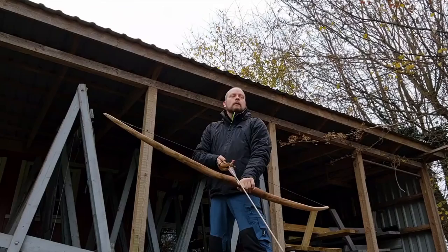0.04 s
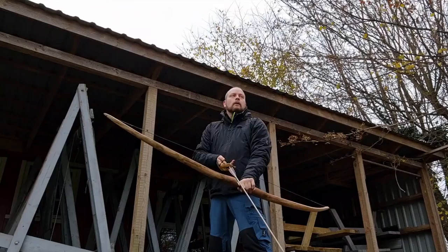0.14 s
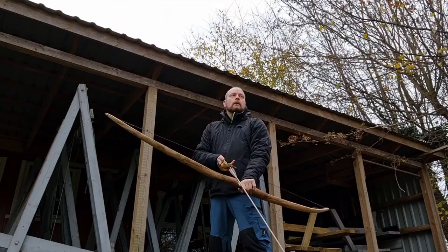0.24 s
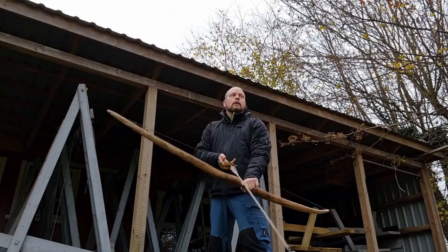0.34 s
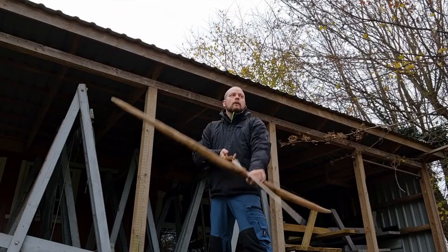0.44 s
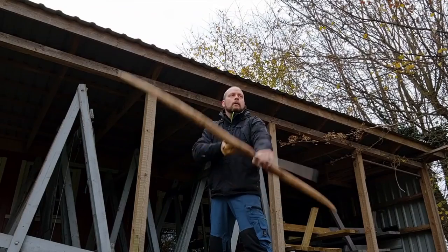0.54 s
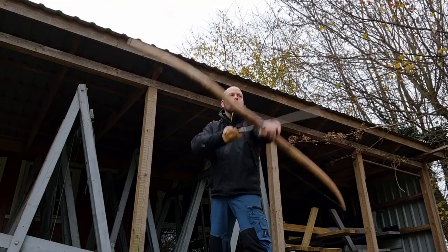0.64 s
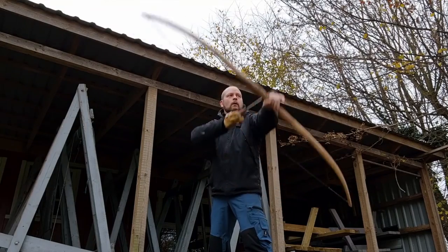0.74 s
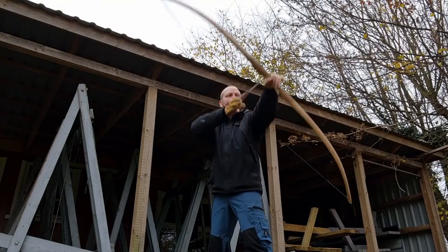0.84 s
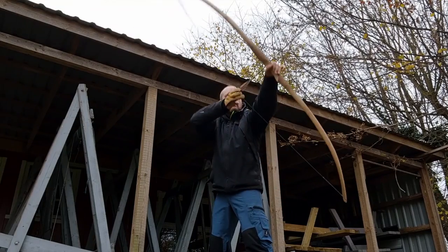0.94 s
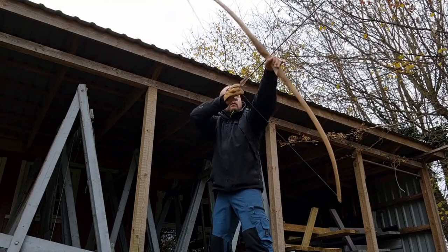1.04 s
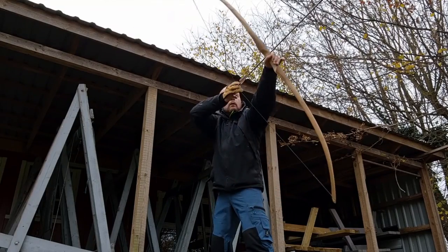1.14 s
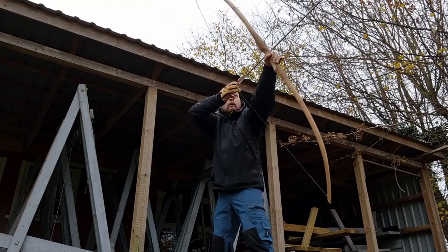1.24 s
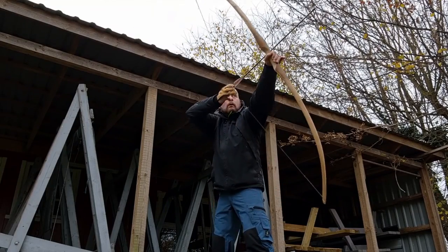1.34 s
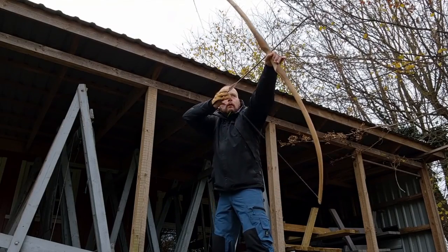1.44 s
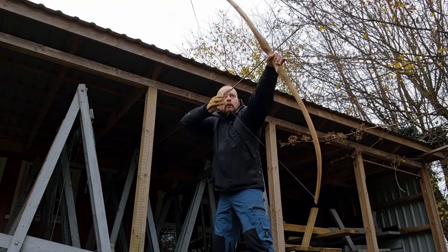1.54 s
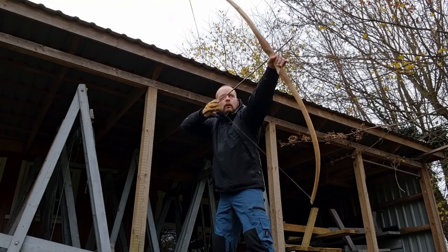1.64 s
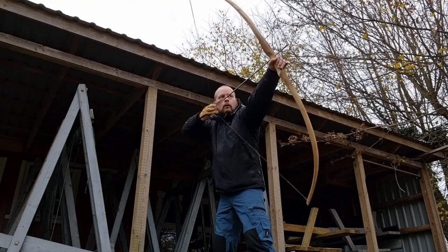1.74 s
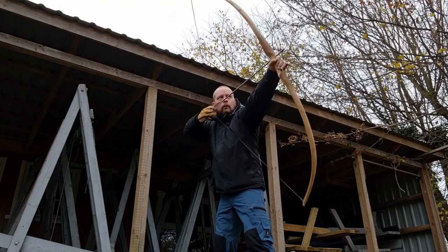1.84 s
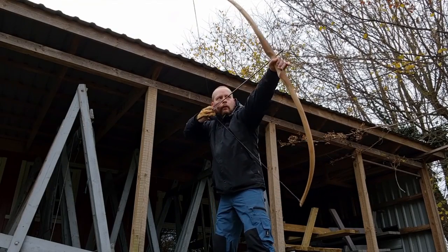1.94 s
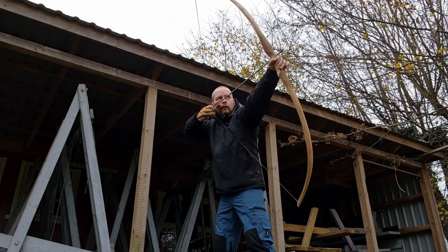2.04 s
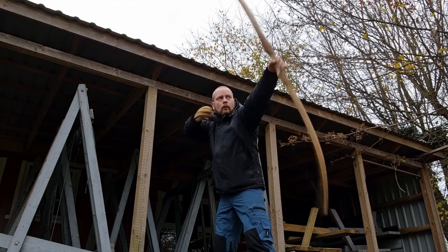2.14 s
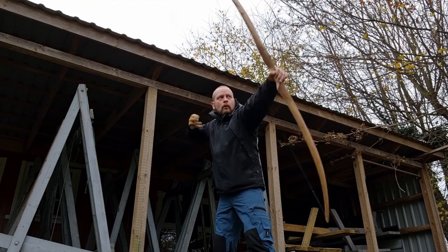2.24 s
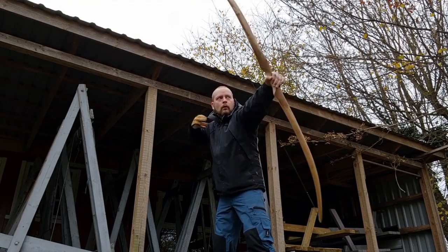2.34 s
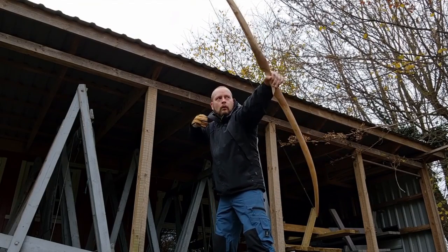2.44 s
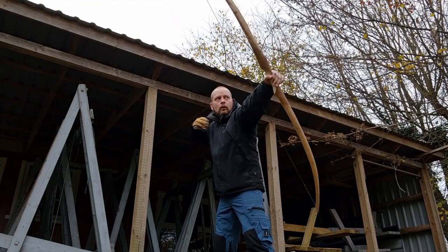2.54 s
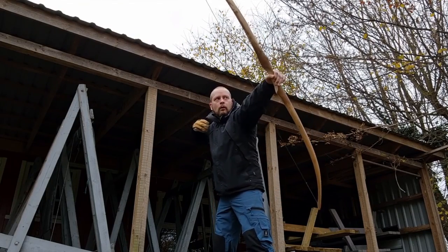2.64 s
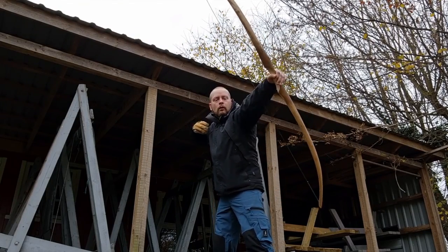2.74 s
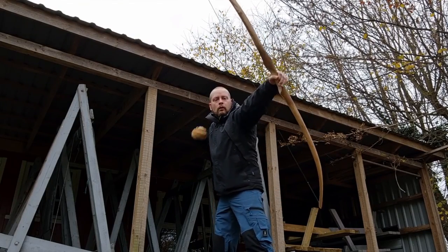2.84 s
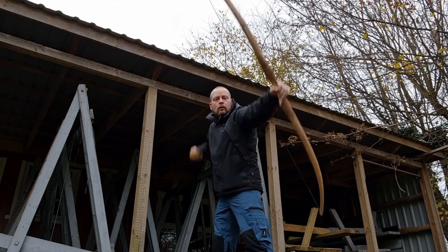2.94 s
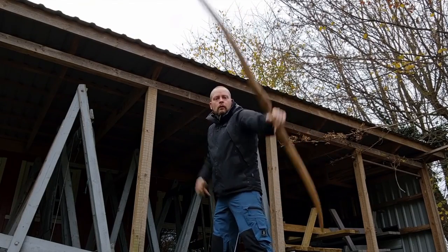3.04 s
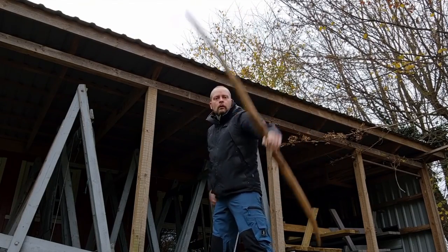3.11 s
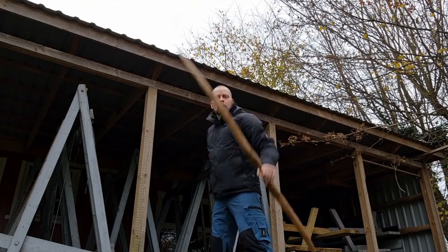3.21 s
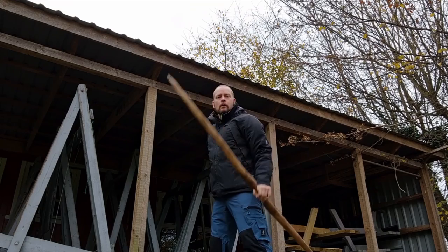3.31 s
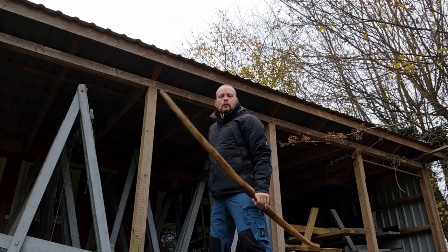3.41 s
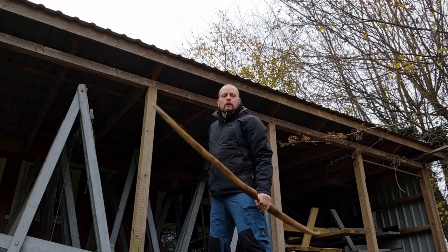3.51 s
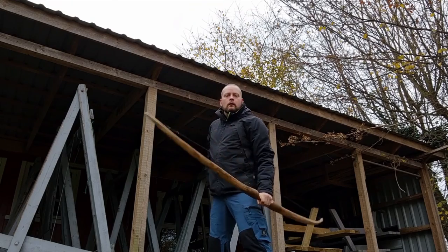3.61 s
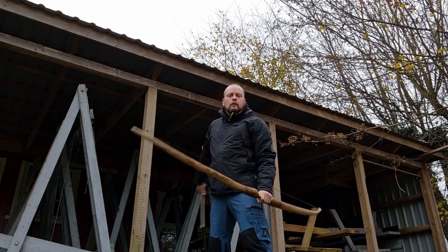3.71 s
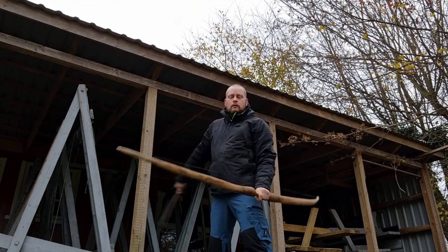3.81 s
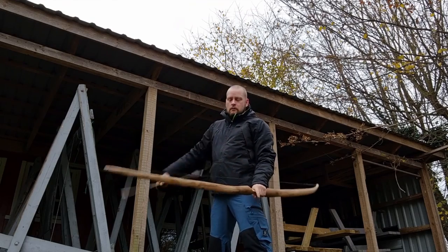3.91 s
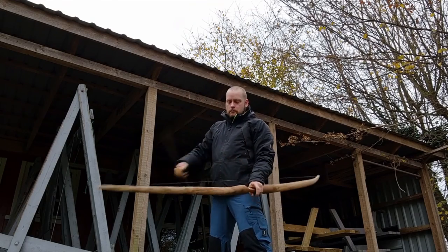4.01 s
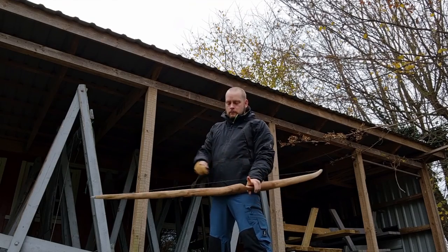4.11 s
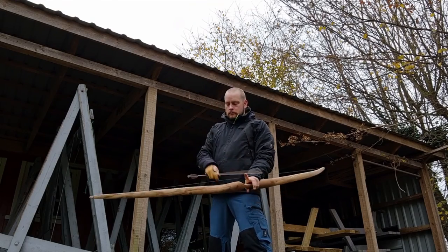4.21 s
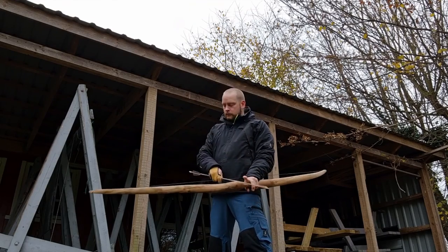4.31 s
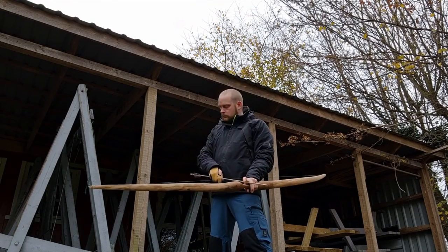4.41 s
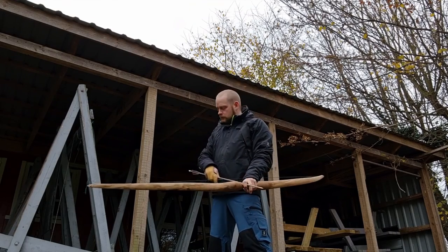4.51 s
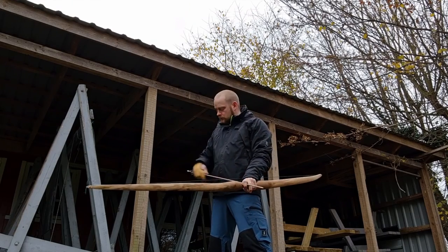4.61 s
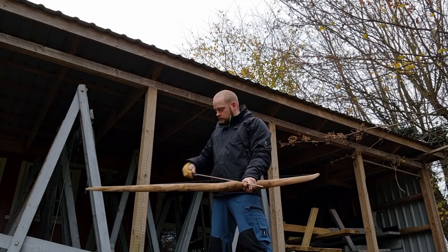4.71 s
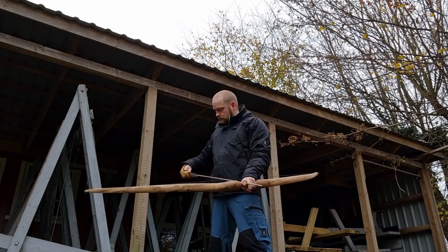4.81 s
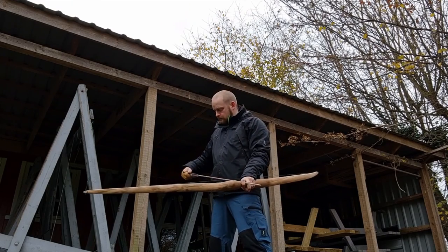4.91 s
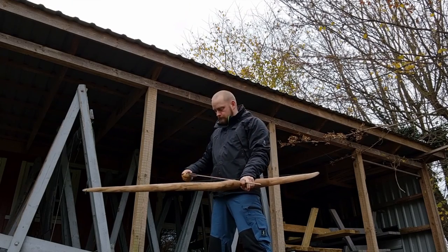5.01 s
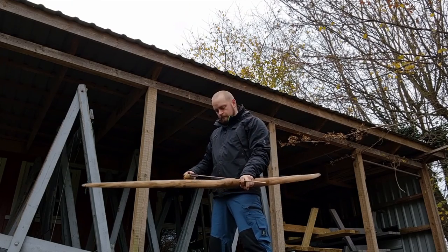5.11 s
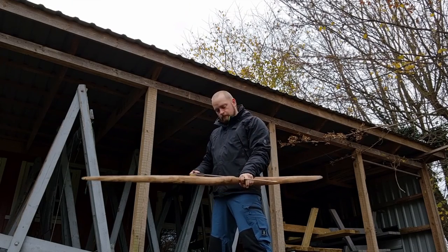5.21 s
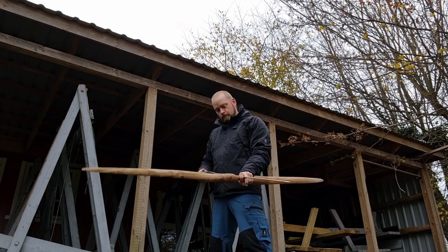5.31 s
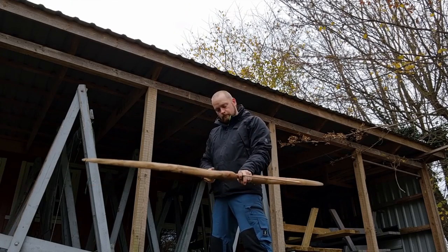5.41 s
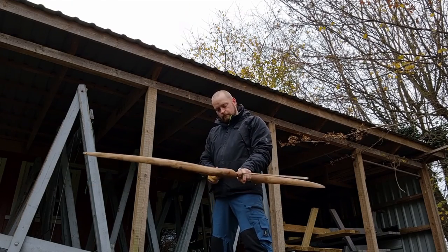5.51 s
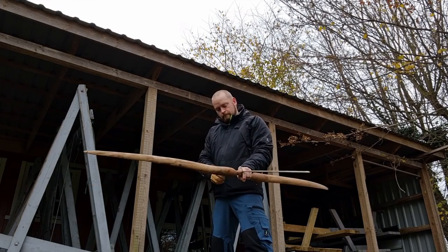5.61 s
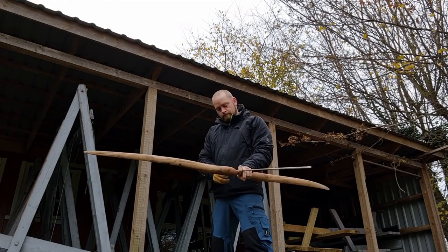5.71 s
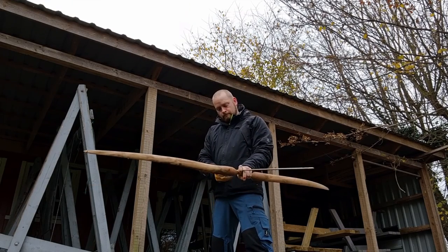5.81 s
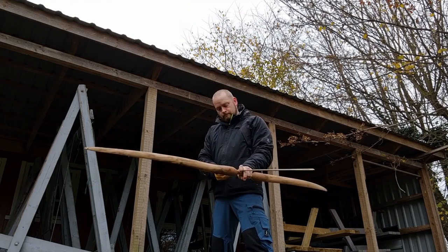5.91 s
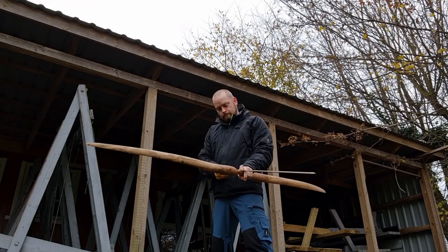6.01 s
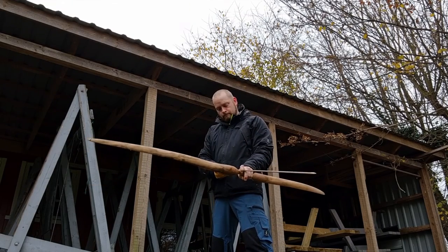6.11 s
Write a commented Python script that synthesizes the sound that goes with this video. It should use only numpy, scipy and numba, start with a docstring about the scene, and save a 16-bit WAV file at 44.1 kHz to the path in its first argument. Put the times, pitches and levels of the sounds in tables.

```python
"""Far traffic rumbles throughout; a longbow swung upward hums, is shot, and its string whistles and snaps taut.
The arrow thuds into a straw target, an open shed returns the thud, and a new arrow clicks and slides on the bow.
Small birds, a rustling jacket and a lorry idling up fill the quiet. Impacts are decaying modes, moving air is
band-passed noise, the swung string and limb are aeolian tones, and the shed is a decaying noise tail."""
import sys
import numpy as np
from scipy import signal
from scipy.fft import rfft, irfft
from scipy.io import wavfile
from scipy.ndimage import uniform_filter1d
from numba import njit

SR = 44100
rng = np.random.default_rng(int(sys.argv[2]) if len(sys.argv) > 2 else 0)


def dump_mix(stems):
    """Bounce the given channels to the path in sys.argv[1] as a 16-bit WAV at rate SR."""
    frames = np.atleast_2d(stems).T  # one column per channel
    limited = np.clip(frames, -1, 1)  # hard clip at full scale
    pcm = np.round(limited * 32767).astype(np.int16)
    wavfile.write(sys.argv[1], SR, pcm)


N = 271377

# Far traffic rumble; only the departure from the mean level is used: [t/s, level/dB]
TRAFFIC_RUMBLE = [(0, -66), (.25, -60), (.6, -66.5), (1.3, -58), (1.95, -62), (2.3, -58.5), (2.88, -58.5),
                  (3.01, -63), (3.25, -59), (4.2, -62), (4.8, -64), (5.36, -58.5), (5.75, -62),
                  (6.15, -54.5)]
# Spectrum of the outdoor air, relative: [f/Hz, level/dB per Hz]
AIR_SPECTRUM = [(15, -40), (25, -26), (53, 4.5), (76, 2.5), (206, -19), (301, -19), (754, -26), (1020, -33),
                (1520, -31.5), (2690, -48.5), (3920, -52.5), (6210, -48.5), (9320, -62), (14800, -55),
                (16000, -66)]
AIR_DB = -56.5
# Correlation of left and right in the outdoor air: [f/Hz, correlation]
AIR_CORRELATION = [(60, 0.94), (130, 0.085), (290, 0.95), (640, 0.017), (3100, 0.036), (6820, 0.36),
                   (15000, 0)]
# Lorry engine, a first cough, then it catches and settles to idle: [t/s, hold/s, level/dB]
LORRY_RUNS = [(4.968, 0.077, -54), (5.162, .05, -50), (5.273, 1.0, -49)]
LORRY_RISE_S, LORRY_FALL_S = 0.084, 0.044
COUGH_HZ, IDLE_HZ, SETTLE_S = 69.4, 56, 0.0752

# Jacket rustling as the arms move, before the trims of each layer:
# [t/s at full level, hold/s, bright level/dB, dull level/dB]
JACKET_MOVES = [(0.443, 0.18, -79.5, -71.5), (.75, 0.33, -86, -80), (1.462, 0.17, -77, -78.5),
                (2.225, 0.062, -74, -69), (2.45, 0.36, -92.5, -80.5), (3.097, 0.28, -89.5, -82),
                (3.4, 0.069, -85, -72.5), (3.809, 0.19, -83.5, -76.5), (4.143, 0.26, -82, -70),
                (4.519, .15, -89, -76.5), (4.76, .06, -80, -75), (5.173, 0.39, -92.5, -76),
                (5.45, 0.43, -90.5, -77), (5.999, .15, -93.5, -82)]
RUSTLE_RISE_S, RUSTLE_FALL_S = .45, 0.39

# Notes of distant birds: [t/s, f/Hz, length/s, level/dB]
BIRD_NOTES = [(1.057, 4070, .098, -86), (1.116, 4570, .067, -86), (1.357, 5840, .07, -85),
              (1.455, 5950, .058, -71.5), (1.527, 5760, .029, -78.5), (1.571, 6240, .021, -75),
              (1.631, 5700, .023, -77), (1.644, 5080, .03, -76), (1.768, 4010, .046, -80.5),
              (1.794, 4598, .1, -86), (1.854, 4060, .034, -80), (1.856, 5950, .056, -79.5),
              (1.937, 4330, .06, -80), (2.006, 4020, .045, -85), (2.028, 4700, .03, -83.5),
              (2.091, 4177, .05, -84.5), (3.726, 3850, .046, -83), (3.746, 4260, .031, -88.5),
              (3.792, 4000, .03, -84), (3.805, 4510, .042, -78), (3.88, 3720, .033, -80.5),
              (3.896, 4160, .014, -83), (3.952, 4100, .076, -80)]
# Blurred twittering further off: [t/s, length/s, centre f/Hz, level/dB]
TWITTER_BOUTS = [(1.06, 0.18, 4440, -84), (1.784, 0.39, 4400, -80), (2.4, .14, 4400, -79),
                 (3.74, .25, 4180, -83.5), (5.17, 0.21, 4540, -86.5)]
TWITTER_EDGE_S = .1

# Reverberation of the shed by band: [f/Hz, decay time T60/s, relative level/dB]
SHED_BANDS = [(123.44, .3, -3.5), (250, 0.33, 1.5), (476, 0.32, -2.5), (1020, 0.27, -2.5),
              (2020, 0.19, 3.5), (3500, .25, 0.5), (5840, 0.085, -9), (8550, 0.24, -1), (13857, 0.15, -1)]
SHED_DB, SHED_GAP_S = -12.5, 0.0013
SNAP_INTO_SHED_DB = -11.5  # the shriek is beamed forward, away from the shed

# Arrow and fingers tapping wood; level is the rms over the rattle: [t/s, level/dB, contact/ms,
# rattle/ms, ring level against the dry knock/dB, left minus right level/dB]
TAPS = [(.7025, -54, 1.4, 1.18, 5, -3), (1.477, -75, .1, 2.8, -17, -8), (3.214, -76, 0.55, 3, -14, -7),
        (3.382, -64, 1.73, 17.5, -19, -5), (4.315, -53.5, 0.57, 6.7, -11.5, -4),
        (4.404, -62, 0.39, 16, -13, 4), (4.414, -49.5, 0.34, 9.2, -3.5, -8.5),
        (4.592, -71, 0.78, 12.5, -12.5, -4), (5.456, -63, 0.56, 31, 7, -6),
        (5.478, -57.5, 1.04, 17.5, 12, 1), (5.518, -67.5, .15, 7.5, -5, -3), (5.532, -69, .15, 5.2, -6, -3),
        (5.555, -67.5, .2, 8.7, -4, -5), (5.574, -70, 0.089, 8, -15, -3), (5.596, -70, .1, 5.7, -14, -3),
        (5.582, -66.5, 0.71, 25, -11, -6)]
# Modes of the arrow shaft: [f/Hz, relative level/dB, T60/s]
SHAFT_MODES = [(620, -22, 0.071), (775, -15.5, 0.09), (891, -6, 0.044), (1525, -8, 0.088),
               (2056, -2.5, 0.087), (2490, -3.5, 0.035), (3070, -0.5, 0.03), (4330, -33, .015)]
# Shaft sliding over wood and glove: [t/s at full level, rise/s, hold/s, fall/s, hiss level/dB,
# squeal f/Hz, squeal level above the hiss/dB]
SLIDES = [(4.313, .01, 0.0018, .09, -62.5, 2400, -12), (4.424, .01, 0.0018, 0.081, -66, 2860, 3.5),
          (4.595, 0.084, 0.019, 0.12, -79, 2110, 2), (4.739, 0.058, 0.043, 0.13, -73, 2950, 4),
          (4.807, 0.11, 0.043, 0.063, -77.5, 2710, -8), (5.443, .15, 0.032, .2, -78, 2100, 1),
          (5.526, 0.16, 0.069, 0.11, -73.5, 2370, -1)]
# Spectrum of the sliding hiss, relative: [f/Hz, level/dB per Hz]
SLIDE_SPECTRUM = [(590, -45), (1000, -16.5), (2420, -27), (2910, -12), (3570, -9), (3870, -7.5), (6260, 0),
                  (15500, -17)]

# String and limb cutting the air on the upswing: [t/s, whistle f/Hz, level/dB]
STRING_SWING = [(.33, 789, -74), (.385, 933, -64.5), (.42, 1084, -48.5), (.44, 1094, -52.5),
                (.475, 1085, -58), (.52, 901, -71), (.555, 804, -59.5), (.6, 789, -57.5), (.64, 790, -79)]
# The limb hums lower, at the height of the swing
LIMB_S, LIMB_RISE_S, LIMB_HOLD_S, LIMB_FALL_S = 0.422, 0.13, 0.083, 0.068
LIMB_HZ, LIMB_DB = 418, -64

# Arrow in the target, direct, back from the shed and last a faint late knock as the stand rocks back:
# [t/s, tip crack level/dB, tip contact/ms, body thump level/dB, lag of the thump/ms, thump contact/ms]
THUDS = [(2.6657, -19, 1.33, -15.5, 5.52, 5.9), (2.7067, -25.5, 1.5, -15, 9.7, 3),
         (2.828, -59, 1.8, -45, 5.4, 2.4)]
# Modes sounded by the tip: [f/Hz, relative level/dB, T60/s]
TIP_MODES = [(380, -8, 0.02), (487, 8, 0.022), (639, 7, 0.045), (740, 6, 0.03), (920, -23, .015)]
# Modes of the target body: [f/Hz, relative level/dB, T60/s]
BUTT_MODES = [(77, -19, 0.033), (121, 14, 0.049), (176, 2.5, 0.025), (204, 0.5, 0.083)]
# Spectrum of the clattering stand, relative: [f/Hz, level/dB per Hz]
STAND_SPECTRUM = [(88, -33), (150, 5), (306, -5.5), (655, -7), (764, -8), (1130, -23.5), (1210, -39),
                  (1500, -43), (1950, -57), (3300, -120)]
# Resonances of the stand: [f/Hz, width/Hz, level against the clatter noise/dB]
STAND_RESONANCES = [(356.3, 43, -4.5), (491.6, 27, -7), (761, 30, -13)]
# Straw crunches as the tip goes in, then settles; the stand clatters until the echo has passed
BITE_DB, BITE_FALL_S, SETTLE_DB, SETTLE_FALL_S = -41.5, 0.0051, -58, 0.098
STAND_DB, STAND_FALL_S, STAND_TAIL_DB, STAND_TAIL_S = -38.5, 0.094, -55.5, 0.65
QUIVER_HZ, QUIVER_DB = 92.7, 3  # the shaft quivers in the straw and chops the crunch
TARGET_PAN_DB, TARGET_LAG_MS = 0.5, 0.31  # the target stands to one side

# String slapping taut, then once more: [t/s, peak level/dB, length/ms]
SNAPS = [(2.2429, -2.5, 5.0), (2.2495, -24, 6.0)]
# Tones of the slap: [f/Hz, relative level/dB]
SNAP_TONES = [(4900, -9.5), (5620, -1.5), (6400, -2), (7100, -14.5), (8200, -14), (8800, -14)]

# Jolts through the stave: [t/s, peak level/dB, contact/ms, air puff level/dB, shaft clatter level/dB]
JOLTS = [(2.2319, -17.5, .3, -32, -31.5), (2.2454, -10, .5, -17.5, -38.5), (2.2522, -17, .4, -26, -27.5),
         (2.258, -23, 0.58, -47.5, -35.5)]
# Modes of the stave: [f/Hz, relative level/dB, T60/s]
STAVE_MODES = [(152, -21.5, 0.019), (269.3, -9.5, 0.071), (480, -5.5, 0.011), (717.6, 4.5, .018),
               (1010, -10.5, 0.004), (1286, -2.5, 0.035), (1880, -2.5, 0.024), (2367, -20.5, 0.013),
               (3300, -9.5, 0.0069)]
# Spectrum of the rushing air, relative: [f/Hz, level/dB per Hz]
RUSH_SPECTRUM = [(600, -33), (1500, -8.5), (3000, -5), (4000, -6), (6000, -10), (9000, -18), (12500, -15.5),
                 (15500, -27)]
# String whistling forward, its pitch climbing with speed
WHISTLE_S, WHISTLE_RISE_S, WHISTLE_HOLD_S, WHISTLE_FALL_S = 2.227, .016, 0.015, .016
WHISTLE_DB, WHISTLE_FROM_HZ, WHISTLE_TO_HZ = -36, 5500, 8500
CREEP_S, CREEP_DB = .055, -78  # fingers slipping off the string before the loose
PUFF_RISE_S, PUFF_HOLD_S, PUFF_FALL_S = .012, .001, .008
CLATTER_RISE_S, CLATTER_HOLD_S, CLATTER_FALL_S = 0.015, .002, .03
# String and stave shivering out after the last jolt
SHIVER_FALL_S, SHIVER_DB, SHIVER_CLATTER_DB, SHIVER_HISS_DB = .16, -45, -37, -47

TOP_HZ = 15800


def undb(db):
    """Level to amplitude: 20 dB is a factor of ten."""
    return 10 ** (np.asarray(db) / 20)


def unit(x):
    """Normalization to an rms of 1."""
    return x / np.sqrt(np.mean(x ** 2))


def unit_of(x, count):
    """Rms of a short sound whose energy is spread over count samples."""
    return np.sqrt(np.sum(x ** 2) / count)


@njit
def svf(x, hz, width):
    """Resonance: a state-variable band-pass with a moving centre, where its gain is 1."""
    y, b, l = np.empty(len(x)), 0., 0.
    for i in range(len(x)):
        g, k = np.tan(np.pi * hz[i] / SR), width / hz[i]
        v = (b + g * (x[i] - l)) / (1 + g * (g + k))
        b, l, y[i] = 2 * v - b, l + 2 * g * v, k * v
    return y


def hiss(hz, width):
    """Band-limited noise of rms 1: two resonances in cascade around a fixed or moving centre."""
    centre = hz + np.zeros(N)
    once = svf(rng.standard_normal(N), centre, 1. * width)
    return unit(svf(once, centre, 1. * width))


def coloured(points):
    """Spectral shaping: noise of rms 1 weighted by a curve of level/dB over f/Hz."""
    hz, db = np.transpose(points)
    f = np.arange(1, N // 2 + 2) * SR / N
    weight = undb(np.interp(np.log(f), np.log(hz), db))
    return unit(irfft(rfft(rng.standard_normal(N)) * weight, N))


def read(table):
    """Linear interpolation of a curve at every sample, with a gate that closes softly outside it."""
    s, *columns = np.transpose(table)
    t = np.arange(N) / SR
    gate = uniform_filter1d(1. * (t > s[0]) * (t < s[-1]), size=200)
    return [np.interp(t, s, c) for c in columns] + [gate]


def walk(rate):
    """Random fluctuation of rms 1: levels held for 1 / rate seconds and smoothed twice."""
    k = int(SR / rate)
    held = np.repeat(rng.standard_normal(N // k + 1), k)
    return unit(uniform_filter1d(uniform_filter1d(held, k), k)[:N])


def swell(s, rise, hold, fall):
    """Exponential growth and decay: gain 1 from s for hold, 40 dB up over rise, 40 dB down over fall."""
    t = np.arange(N) / SR - s
    return undb(-40 * np.clip(np.maximum(-t / rise, (t - hold) / fall), 0, 4))


def ring(modes, contact_ms, scatter_db=0):
    """Modal superposition: damped sinusoids struck by a push of finite contact time; peak 1."""
    t = np.arange(SR // 4) / SR
    y = 0
    for f, db, t60 in modes:
        strength = undb(db + scatter_db * rng.standard_normal())
        y = y + strength * np.sin(2 * np.pi * f * t) * 1000 ** (-t / t60)
    push = np.hanning(int(contact_ms * SR / 1000) + 3)
    y = np.convolve(y, push)[:len(t)]
    return y / np.abs(y).max()


def add(out, s, sound):
    """Linear superposition of a sound at time s."""
    i = int(s * SR)
    out[..., i:i + sound.shape[-1]] += sound


def pan(x, db):
    """Interchannel level difference: left exceeds right by db."""
    return x * undb(np.array([[db], [-db]]) / 2)


def lorry():
    """Periodic combustion: a sine at the engine's pitch, sinking exponentially from the first cough to idle."""
    since_cough = np.maximum(np.arange(N) / SR - LORRY_RUNS[0][0], 0)
    hz = IDLE_HZ + (COUGH_HZ - IDLE_HZ) * np.exp(-since_cough / SETTLE_S)
    runs = sum(undb(db) * swell(s, LORRY_RISE_S, hold, LORRY_FALL_S) for s, hold, db in LORRY_RUNS)
    uneven = undb(3.03 * walk(9.2))
    return runs * uneven * np.sqrt(2) * np.sin(2 * np.pi * np.cumsum(hz) / SR)


def outdoors():
    """Partial coherence: traffic and wind noise in half-octave bands flickering apart, with the lorry."""
    rumble_db, _ = read(TRAFFIC_RUMBLE)
    f = np.arange(N // 2 + 1) * SR / N
    mid, side = rfft(coloured(AIR_SPECTRUM)), rfft(coloured(AIR_SPECTRUM))
    like_hz, like = np.transpose(AIR_CORRELATION)
    like = np.clip(np.interp(np.log(f + 1), np.log(like_hz), like), 0, .99)
    pair = mid * np.sqrt((1 + like) / 2) + side * np.sqrt((1 - like) / 2) * np.array([[1], [-1]])
    air = 0
    for hz in 25 * 2 ** np.arange(0, 9.6, .5):
        share = np.cos(np.pi * np.clip(np.log2((f + 1) / hz), -.5, .5)) ** 2
        # passing vehicles swell the bass: fully up to 110 Hz, not at all from 220 Hz
        swell_db = (rumble_db - rumble_db.mean()) * np.clip(np.log2(220 / hz), 0, 1)
        air = air + irfft(pair * share, N) * undb(swell_db + 1.5 * walk(17))
    return undb(AIR_DB) * air + lorry()


def jacket():
    """Friction noise of nylon: bright folds flutter each on their own over a dull rub."""
    moves = np.array([swell(s, RUSTLE_RISE_S, hold, RUSTLE_FALL_S) for s, hold, _, _ in JACKET_MOVES])
    # overlapping moves add in power
    bright, dull = np.sqrt(undb(np.array(JACKET_MOVES)[:, 2:].T) ** 2 @ moves ** 2)
    folds = undb(-6.5) * hiss(11000, 6500)
    for hz in (5100, 6000, 6997, 8200):
        folds = folds + undb(2.5 * walk(30)) * np.array([hiss(hz, hz / 5), hiss(hz, hz / 5)])
    rub = undb(-3.5 + 1.0 * walk(30)) * np.array([hiss(1500, 1500), hiss(1700, 1200)])
    return bright * undb(-8.0) * folds + dull * rub


def birds():
    """Amplitude modulation: sine notes made husky by noise, with a trailing echo, over a blur of twitter."""
    out = np.zeros((2, N))
    for s, hz, length, db in BIRD_NOTES:
        u = np.arange(0, 3, 1 / (length * SR))  # time in note lengths
        rough = uniform_filter1d(uniform_filter1d(rng.standard_normal(20000), size=60), size=60)
        husk = .9 + 0.61 * unit(rough)[:len(u)]
        body = np.sin(np.pi * np.minimum(u, .8))
        shape = np.where(u < 1, body, 0.23 * np.exp(-1.5 * (u - 1)))
        note = husk * shape * np.sin(2 * np.pi * hz * u * length)
        add(out, s, pan(undb(db) * note, 2 * rng.standard_normal()))
    bouts = np.array([undb(db) * swell(s, TWITTER_EDGE_S, length, TWITTER_EDGE_S)
                      for s, length, _, db in TWITTER_BOUTS])
    hz = np.array(TWITTER_BOUTS)[bouts.argmax(axis=0), 2]  # centre of the loudest bout
    blur = undb(2.7 * walk(40)) * np.array([hiss(hz, 1300) for _ in range(2)])
    return out + bouts.sum(axis=0) * blur


def shed(dry):
    """Reverberation: roof and posts scatter a short tail, separate left and right, each band with its decay."""
    t = np.arange(SR // 2) / SR
    tail = 0
    for hz, t60, db in SHED_BANDS:
        noise = hiss(hz, hz)[:2 * len(t)].reshape(2, -1)
        tail = tail + noise * undb(db) * np.sqrt(hz) * 1000 ** (-t / t60)
    tail = tail * (t > SHED_GAP_S)
    tail = tail / np.sqrt(np.sum(tail ** 2, axis=1, keepdims=True))
    mono = dry.mean(axis=0, keepdims=True)
    return undb(SHED_DB) * signal.fftconvolve(mono, tail, axes=1)[:, :N]


def arrow_taps():
    """Repeated impact: rattling contacts, each a dry knock that also excites the modes of the shaft."""
    out = np.zeros((2, N))
    for s, db, contact_ms, rattle_ms, ring_db, pan_db in TAPS:
        count = int(rattle_ms * SR / 1000)
        strength = rng.standard_normal(2000)[:count] ** 2
        bounces = strength * np.sign(rng.standard_normal(2000))[:count]
        bounces = bounces * np.hanning(count)
        body = undb(ring_db) * ring(SHAFT_MODES, contact_ms, scatter_db=1.5)
        u = np.arange(600) / (contact_ms / 8 * SR / 1000)
        knock = (u ** 2 - u ** 2 * u / 3) * np.exp(-u)  # a push and the spring back
        add(body, 0, knock / knock.max())
        tap = signal.fftconvolve(body, bounces)
        add(out, s, pan(undb(db) * tap / unit_of(tap, count), pan_db))
    return out


def arrow_slides():
    """Sliding friction: dense grit as fluctuating noise, with a squeal as a narrower band."""
    grit = np.array([undb(db) * swell(s, rise, hold, fall) for s, rise, hold, fall, db, _, _ in SLIDES])
    hz, squeal_db = np.array(SLIDES)[grit.argmax(axis=0), 5:].T  # those of the loudest slide
    rub = np.array([coloured(SLIDE_SPECTRUM), coloured(SLIDE_SPECTRUM)])
    rub = rub + undb(squeal_db + 2.1 * walk(73)) * hiss(hz, 1340)
    return grit.sum(axis=0) * undb(1.8 * walk(160)) * rub


def swing():
    """Vortex shedding: string and limb sing aeolian tones, frayed by turbulence; the string's pitch moves."""
    hz, db, gate = read(STRING_SWING)
    string = gate * undb(db + 2.65 * walk(60.7))
    limb = undb(LIMB_DB) * swell(LIMB_S, LIMB_RISE_S, LIMB_HOLD_S, LIMB_FALL_S)
    out = 0
    for pitch, gain in (hz, string), (LIMB_HZ + np.zeros(N), limb):
        tone = np.sqrt(2) * np.sin(2 * np.pi * np.cumsum(pitch) / SR)
        out = out + gain * (0.63 * tone + 0.49 * hiss(pitch, 143))
    return pan(out, -2.0)


def target():
    """Impact and recoil: the tip cracks in, the whole butt thumps low, and straw and stand rattle."""
    hit, echo = THUDS[0][0], THUDS[1][0]
    bite = undb(BITE_DB) * swell(hit, 0.0016, 0, BITE_FALL_S)
    settle = undb(SETTLE_DB) * swell(hit + 0.011, 0.053, echo - hit - .01, SETTLE_FALL_S)
    quiver_db = QUIVER_DB * np.cos(2 * np.pi * QUIVER_HZ * (np.arange(N) / SR - hit - .001))
    crunch = (bite + settle) * undb(quiver_db)
    clatter = undb(STAND_DB) * swell(hit, 0.0085, echo - hit + 0.013, STAND_FALL_S)
    clatter = clatter + undb(STAND_TAIL_DB) * swell(echo, 0.041, 0.03, STAND_TAIL_S)
    out = np.array([crunch * undb(1.5 * walk(150)) * hiss(2000, 4600) for _ in range(2)])
    resonances = sum(undb(db) * hiss(hz, width) for hz, width, db in STAND_RESONANCES)
    out += clatter * (coloured(STAND_SPECTRUM) + resonances)
    for s, tip_db, tip_ms, thump_db, lag_ms, thump_ms in THUDS:
        add(out, s, -undb(tip_db) * ring(TIP_MODES, tip_ms))
        add(out, s + lag_ms / 1000, -undb(thump_db) * ring(BUTT_MODES, thump_ms))
    out[0] = np.roll(out[0], int(TARGET_LAG_MS * SR / 1000))  # left arrives later
    return pan(out, TARGET_PAN_DB)


def shot():
    """Acceleration and recoil: the string whistles forward with rising pitch and shakes the stave's modes."""
    speed = np.clip((np.arange(N) / SR - WHISTLE_S) / WHISTLE_HOLD_S, 0, 1)
    hz = WHISTLE_FROM_HZ + (WHISTLE_TO_HZ - WHISTLE_FROM_HZ) * speed
    creep = undb(CREEP_DB) * swell(WHISTLE_S - CREEP_S, .02, CREEP_S, WHISTLE_FALL_S)
    whistle = undb(WHISTLE_DB) * swell(WHISTLE_S, WHISTLE_RISE_S, WHISTLE_HOLD_S, WHISTLE_FALL_S) + creep
    shiver = swell(JOLTS[-1][0], PUFF_RISE_S, 0, SHIVER_FALL_S)
    rush = creep + undb(SHIVER_DB) * shiver
    clatter = undb(SHIVER_CLATTER_DB) * shiver
    for s, _, _, puff_db, clatter_db in JOLTS:
        rush = rush + undb(puff_db) * swell(s, PUFF_RISE_S, PUFF_HOLD_S, PUFF_FALL_S)
        clatter = clatter + undb(clatter_db) * swell(s, CLATTER_RISE_S, CLATTER_HOLD_S, CLATTER_FALL_S)
    out = np.array([whistle * hiss(hz, 1500) + rush * coloured(RUSH_SPECTRUM) for _ in range(2)])
    out += clatter * hiss(550, 900)
    out += undb(SHIVER_HISS_DB) * shiver * np.array([hiss(6300, 5000) for _ in range(2)])
    for s, db, contact_ms, _, _ in JOLTS:
        add(out, s, -undb(db) * ring(STAVE_MODES, contact_ms))
    return out


def snap():
    """Beating of neighbouring tones: the string slaps taut with a short shriek."""
    out = np.zeros((2, N))
    for s, db, length_ms in SNAPS:
        t = np.arange(int(length_ms * SR / 1000)) / SR
        slap = 0
        for k, (f, tone_db) in enumerate(SNAP_TONES):
            sense = (-1) ** k  # neighbours swing in opposite sense at mid-slap
            slap = slap + sense * undb(tone_db) * np.sin(2 * np.pi * f * (t - t.mean()))
        slap = np.hanning(len(t)) * slap
        slap = undb(db) * slap / np.abs(slap).max()
        add(out, s, pan(np.array([slap, np.roll(slap, 1)]), 4))  # right hears it one sample later
    return out


def scene():
    """Superposition of the direct sounds, their reverberation in the shed, the jacket and the outdoors."""
    near = swing() + shot() + target() + arrow_taps() + arrow_slides() + birds()
    slap = snap()
    reverberant = shed(near + undb(SNAP_INTO_SHED_DB) * slap)
    return near + slap + reverberant + jacket() + outdoors()


def record(dry):
    """Band limiting and saturation: fade in, cut the deepest bass, round loud peaks, cut the top."""
    fade = np.clip(np.arange(N) / SR / 0.033, 0, 1) ** 2
    bass_cut = signal.butter(2, 45, "highpass", fs=SR, output="sos")
    thin = signal.sosfilt(bass_cut, dry * fade)
    top_cut = signal.ellip(8, .2, 70, TOP_HZ, fs=SR, output="sos")
    return signal.sosfilt(top_cut, np.tanh(thin))


dry = scene()
out = record(dry)
dump_mix(out)
```